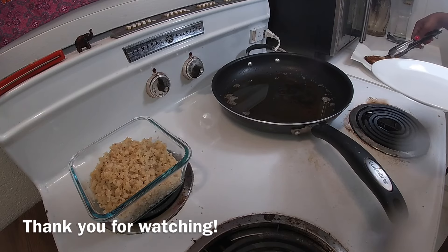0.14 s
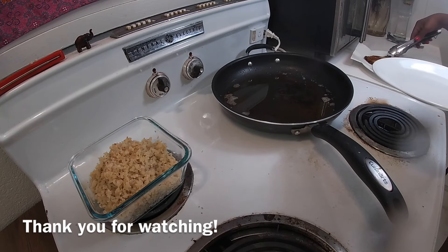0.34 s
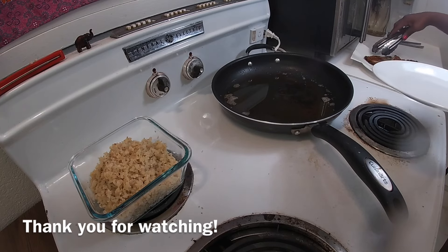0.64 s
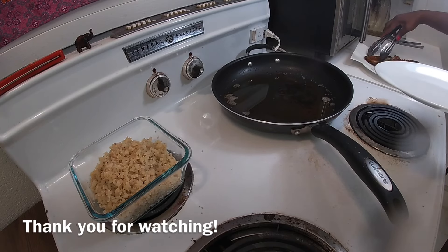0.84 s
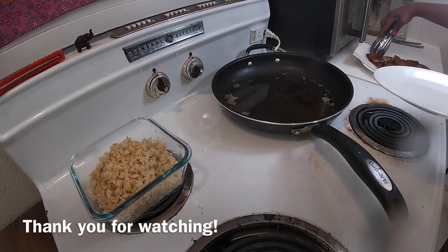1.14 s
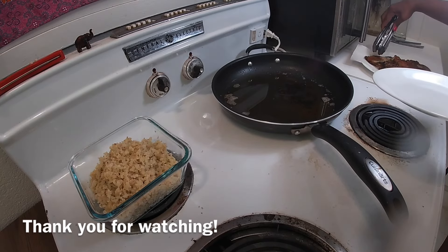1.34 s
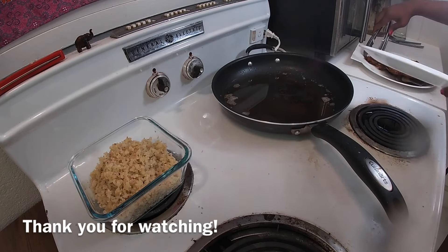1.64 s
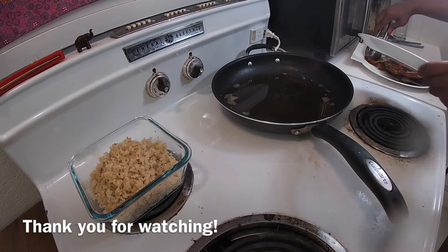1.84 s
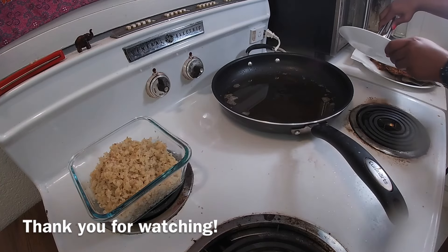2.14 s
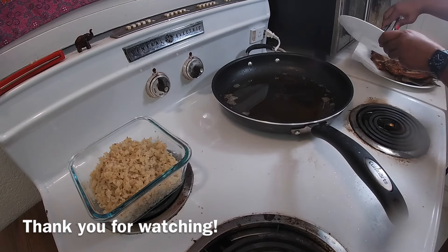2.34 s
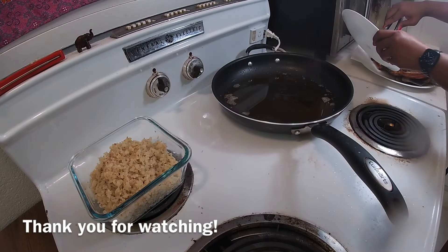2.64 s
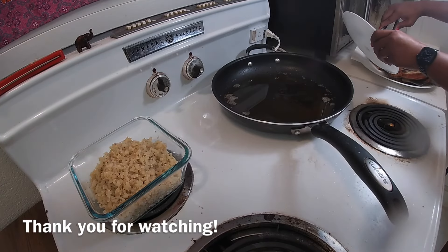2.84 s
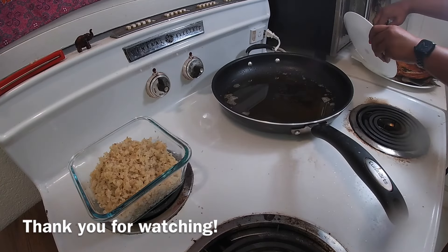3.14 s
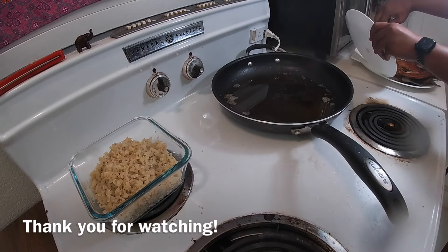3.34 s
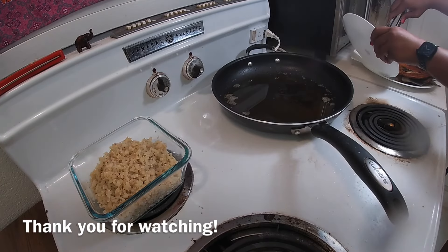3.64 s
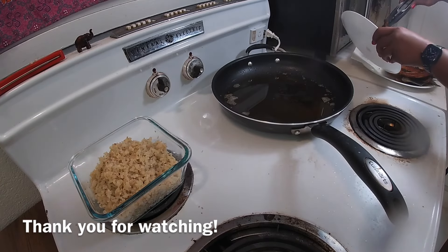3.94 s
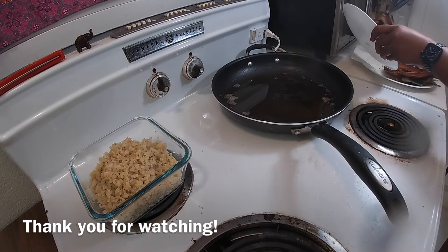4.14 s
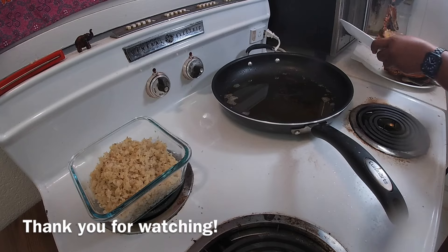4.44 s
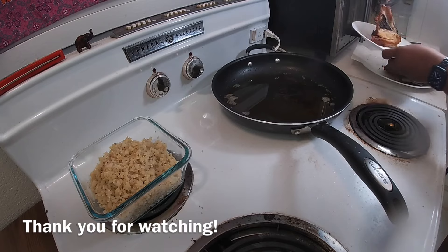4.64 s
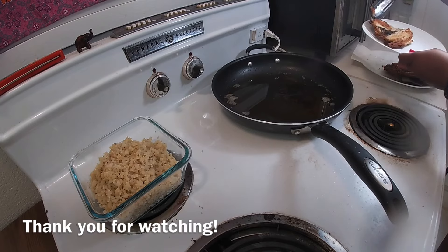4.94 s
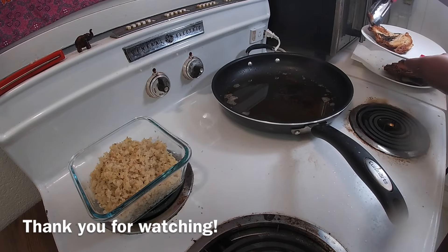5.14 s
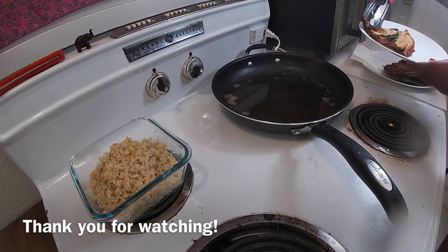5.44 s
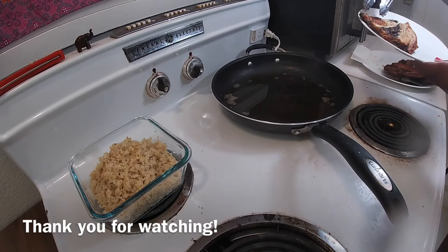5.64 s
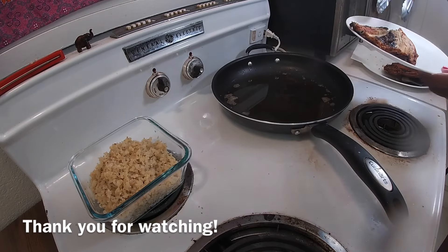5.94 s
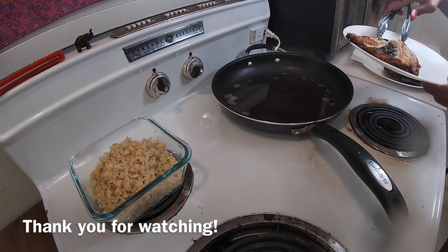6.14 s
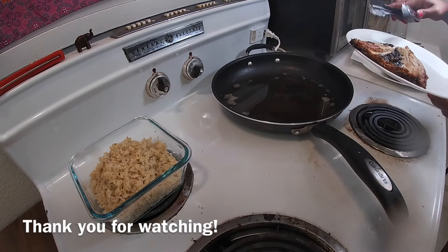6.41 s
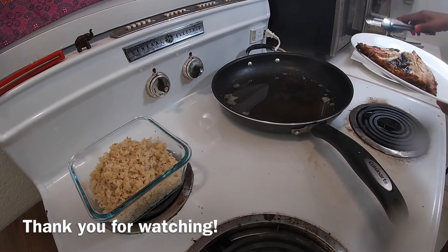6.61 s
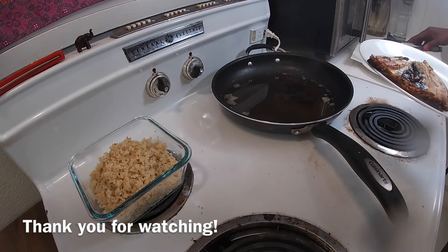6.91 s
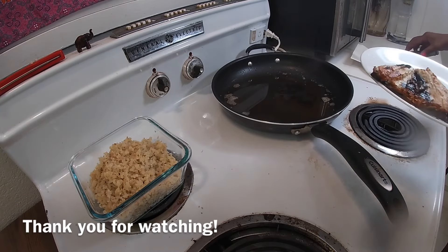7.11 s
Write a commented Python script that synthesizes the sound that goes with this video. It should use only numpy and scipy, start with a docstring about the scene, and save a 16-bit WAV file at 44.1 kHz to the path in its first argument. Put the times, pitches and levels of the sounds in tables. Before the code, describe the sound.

In a small home kitchen, a low wavering motor hum and soft rush of air run throughout. Faint tong ticks and a dull counter bump come first, then a bright cluster of steel-on-ceramic clacks with booming knocks around three seconds. More clinks follow as crisp fried crust rustles. The later part is quiet, with small dry ticks and faint squeaks, before a last soft bump. Close, mono, with short room echo.

```python
"""Steel tongs clack and skid on a hand-held ceramic plate as they lift fried fish from a paper towel.
Filtered noise bursts make the cracks of contact, and banks of decaying sines make steel and plate ring.
Dishes bump the counter with low booms, small dry steel ticks sound, and tiny impulses rustle as crust.
A few faint gliding tones squeak; wavering motor tones and a rush of air hum underneath.
Noise tails give the small kitchen's echo, and the extreme top is cut."""
import sys
import numpy as np
from scipy import signal
from scipy.fft import rfft, irfft, next_fast_len
from scipy.io import wavfile
from scipy.ndimage import uniform_filter1d

SR = 44100
rng = np.random.default_rng(int(sys.argv[2]) if len(sys.argv) > 2 else 0)


def waveform_to_disk(signal):
    """Save audio, clipped to [-1, 1], as 16-bit WAV at the path in sys.argv[1]."""
    frames = np.transpose(np.atleast_2d(signal))
    scaled = np.clip(frames, -1, 1) * 32767
    samples = np.round(scaled).astype(np.int16)
    wavfile.write(sys.argv[1], SR, samples)


N = 320607
T = np.arange(N) / SR  # scene time in seconds
AGE = T[:int(.8 * SR)]  # time since a blow in seconds; every hit and echo is cut at 0.8 s
BURST = SR / 100  # samples in 10 ms, the reference length for the level of a blow

# Spectrum of the crust's crackle, also lent to clicks and grit. Each row: frequency in Hz, level in dB.
CRUST_SPECTRUM = [(300, 10), (1500, 0), (4000, 2.5), (6500, 2), (9500, 0.5), (11200, -11.5), (15000, -23)]
# Steel scoops of the tongs, ringing on after a touch.
# Each row: frequency in Hz, relative level in dB, decay by 60 dB in seconds.
SCOOP_MODES = [(4030, -7.5, 0.36), (4690, -1, 0.065), (4800, -13, 0.41), (5868, -1.5, 0.044),
               (8420, 5, 0.037), (8300, -6, 0.2), (9640, -0.5, 0.09)]


def undb(db):
    """Decibels to gain."""
    return 10 ** (np.asarray(db) / 20)


def unit(x):
    """Scale to rms 1."""
    return x / np.sqrt(np.mean(x ** 2))


def blow(x, db):
    """Give a transient the energy of a 10 ms burst at this level."""
    return x * undb(db) * np.sqrt(BURST / np.sum(x ** 2))


def fade(t60):
    """Exponential decay, falling 60 dB in t60 seconds."""
    return np.exp(-np.log(1000) * AGE / max(t60, 1 / SR))


def lookup(points, hz):
    """Read a table on a log-frequency axis."""
    f, value = np.transpose(points)
    return np.interp(np.log(hz), np.log(f), value)


def colour(x, db_of_hz):
    """Filter causally to the given dB response, with the minimum phase found from its cepstrum."""
    size = 2 * next_fast_len(len(x))
    hz = np.maximum(np.arange(size // 2 + 1) * SR / size, 1)
    cepstrum = irfft(np.log(undb(db_of_hz(hz))))
    # fold the cepstrum onto positive time
    cepstrum[1:size // 2] *= 2
    cepstrum[size // 2 + 1:] = 0
    response = np.exp(rfft(cepstrum))
    return irfft(rfft(x, size) * response)[:len(x)]


def noise(points, size):
    """Noise with a given spectrum, at rms 1."""
    return unit(colour(rng.standard_normal(size), lambda hz: lookup(points, hz)))


def soft(hz, corner_hz):
    """A soft contact lasts longer and loses the treble: dB response, 12 dB per octave past the corner."""
    return -10 * np.log10(1 + (hz / corner_hz) ** 4)


def walk(rate):
    """Smooth random wander of rms 1, taking this many steps per second."""
    k = int(SR / rate)
    steps = np.repeat(rng.standard_normal(N // k + 1), k)
    return unit(uniform_filter1d(steps, k)[:N])


def grains(per_s, spread_db):
    """Random tiny impulses, of uneven size where there is a spread."""
    fires = rng.random(N) < per_s / SR
    sign = rng.choice([-1, 1], N)
    return fires * sign * undb(spread_db * np.minimum(rng.exponential(size=N), 5))


def presses(rows, attack_s, release_s):
    """Hand pressure: each press builds up, holds until its length is over and dies away."""
    out = 0
    for start, length, db in rows:
        rise = np.clip((T - start) / attack_s, 0, 1)
        release = np.exp(-np.maximum(T - start - length, 0) / release_s)
        out = out + undb(db) * rise * release
    return out


def add(out, s, x):
    """Mix a sound in at time s."""
    i = max(int(s * SR), 0)
    out[i:i + len(x)] += x[:N - i]


def ring(modes, detune=0, scatter_db=0.88):
    """Struck modes as decaying sines; each blow shares its energy out a little differently."""
    out = 0
    for hz, db, t60 in modes:
        pitch_hz = hz * (1 + detune * rng.standard_normal())
        wave = np.sin(2 * np.pi * (pitch_hz * AGE + rng.random())) * fade(t60)
        out = out + blow(wave, db + scatter_db * rng.standard_normal())
    return out * (1 - fade(.004))  # the onset is rounded over a few ms


def plate_ring(place):
    """The place of the blow, between face (0) and rim (1), decides which plate modes ring most."""
    # Ceramic plate. Each row: frequency in Hz, relative level in dB when struck on the face,
    # relative level in dB when struck on the rim, decay by 60 dB in seconds.
    plate_modes = [(1164, -1, -21, 0.29), (1165, 5.5, -4.5, 0.23), (5200, -20, -3, 0.11),
                   (2071, -9, -3, 0.26), (2104, -20, -1.5, 0.06), (2350, -8.5, -29, 0.12),
                   (3414, -8.5, -8.5, 0.19), (4010, -5, -23, 0.29), (4860, -7.5, -17, 0.36),
                   (5400, -17, -22, 0.2), (5922, -27, -28, .26), (6638, -11, -40, .26),
                   (9265, -18, -26, 0.3)]
    modes = []
    for hz, face_db, rim_db, t60 in plate_modes:
        modes.append((hz, np.interp(place, [0, 1], [face_db, rim_db]), t60))
    return ring(modes)


def chatter(x, length_s, rebound=0.64, count=4):
    """The steel bounces a few times, more weakly each time; short chatter has weaker bounces."""
    out = x.copy()
    sizes = rebound ** np.arange(1, count + 1) * min(length_s / 0.013, 1)
    for k, size in enumerate(sizes):
        lag = 1 + int(length_s * SR * (k + rng.random()) / 2)
        out[lag:] += size * x[:-lag]
    return out / np.sqrt(1 + np.sum(sizes ** 2))


def clinks(crack_db=-4, crack_t60=0.12, spot_octaves=0.1, wash_t60=0.61, wash_db=-12,
           beat_db=3, beat_rate=160):
    """Tips clack and crack; plate and tongs ring amid noise for crowded weak modes that beat unevenly."""
    # Tongs meet the plate; levels are ahead of the contact filter. Each row: start in seconds,
    # clack level in dB, plate ring level in dB, tong ring level in dB, contact corner in Hz,
    # chatter time scale in seconds, place from 0 face to 1 rim, pitch favoured by the spot in Hz.
    touches = [(2.634, -21, -25.5, -45, 7300, 0.014, .05, 5400),
               (2.9018, -32.5, -40, -53, 6160, 0.0005, .05, 3120),
               (2.993, -41.5, -45.5, -41, 11100, 0.0066, .97, 2060),
               (3.0038, -37.5, -42, -36, 12000, 0.0011, .95, 5900),
               (3.0555, -21.5, -26, -42, 7340, 0.0025, 0.18, 3240),
               (3.58, -22, -28, -47, 8150, 0.00045, .03, 1140),
               (3.958, -42.5, -44.5, -47, 13900, 0.0029, 0.39, 8000),
               (4.0355, -47.5, -47.5, -54, 7000, 0.0094, 0.97, 4800),
               (4.3222, -26.5, -32, -25.5, 2570, 0.0099, 0.56, 1470),
               (4.337, -22, -37, -53, 1270, 0.022, .4, 1100),
               (4.608, -60, -56, -49, 5030, 0.0034, 0.77, 3900),
               (4.771, -55, -46.5, -72, 7750, 0.0054, 0.72, 2150),
               (7.1533, -31, -48, -64, 1560, 0.0062, .3, 1390)]
    # Tong tips, damped by the grip. Each row: frequency in Hz, relative level in dB,
    # decay by 60 dB in seconds.
    tip_modes = [(1056, -10.5, 0.094), (2336, -9, 0.038), (3052, 0.5, 0.017), (4032, 1.5, 0.015),
                 (4710, -4, 0.024), (5420, 0, 0.019), (5990, 3, 0.0066), (8810, -3, 0.018),
                 (9800, -4, 0.011)]
    # Spectrum of the contact crack. Each row: frequency in Hz, level in dB.
    crack_spectrum = [(150, -7.5), (500, -2), (1000, -3.5), (1700, 0), (3000, -6.5), (6000, -3.5),
                      (10000, -4), (11200, -13.5), (15000, -22.5)]
    # the softer the contact, the louder the wash ahead of the contact filter
    hard_hz, wash_lift_db_per_octave = 6940, 2.5
    # the lighter the touch, the more its spot colours it
    full_blow_db, spot_lift_db, spot_db_per_db = -25, 3.5, 0.1174

    out = np.zeros(N)
    for s, clack_db, plate_db, tongs_db, corner_hz, chatter_s, place, spot_hz in touches:
        wash_lift_db = wash_lift_db_per_octave * max(np.log2(hard_hz / corner_hz), 0)
        lift_db = spot_lift_db + spot_db_per_db * (full_blow_db - clack_db)

        crack = noise(crack_spectrum, len(AGE)) * fade(crack_t60)
        clack = blow(ring(tip_modes), 0) + blow(crack, crack_db)

        beating = undb(beat_db * walk(beat_rate)[:len(AGE)])
        wash = noise(crack_spectrum, len(AGE)) * fade(wash_t60) * beating
        ringing = blow(plate_ring(place), plate_db) + blow(ring(SCOOP_MODES, detune=0.0043), tongs_db)
        ringing = ringing + blow(wash, clack_db + wash_db + wash_lift_db)

        build_up = 1 - fade(2 * chatter_s)  # the bounces build the ring up
        hit = blow(chatter(clack, chatter_s), clack_db) + ringing * build_up

        def contact_db(hz):
            """Treble lost to a soft contact, and a narrow lift at the spot's pitch."""
            spot = np.exp(-(np.log2(hz / spot_hz) / spot_octaves) ** 2)
            return soft(hz, corner_hz) + lift_db * spot

        add(out, s, colour(hit, contact_db))
    return out


def skids(slips_per_s=90, pressed_t60=0.38, grit_db=-7, plate_db=-5, place=0.74):
    """Steel sticks and slips on the glaze; each gritty jerk sets tongs and plate jingling."""
    # The tips skid over the glaze. Each row: start in seconds, length in seconds, level in dB.
    slides = [(2.96, .026, -49), (3.9, 0.19, -58.5)]
    pressure = presses(slides, attack_s=0.034, release_s=0.0074)
    jingle = blow(ring(SCOOP_MODES), 0) + blow(plate_ring(place), plate_db)
    jingle = jingle * fade(pressed_t60)  # extra damping under pressure
    grit = noise(CRUST_SPECTRUM, len(AGE)) * fade(0.024)
    jerk = blow(jingle, 0) + blow(grit, grit_db)
    slips = unit(grains(slips_per_s, spread_db=0)) * pressure
    return signal.fftconvolve(slips, jerk / np.linalg.norm(jerk))[:N]


def bumps(rattle_db=-8, low_hz=120, knock_db=-2):
    """The counter booms at a pitch set by its load, with a woody knock on top that has little deep bass."""
    # Dishes bump the counter. Each row: start in seconds, boom level in dB, boom pitch in Hz,
    # boom decay by 60 dB in seconds, contact corner of the knock in Hz.
    thuds = [(.921, -36.5, 150.5, 0.33, 196), (1.384, -23.5, 141.6, 0.27, 100),
             (2.636, -20, 158, 0.29, 1010), (2.904, -31.5, 153.6, 0.54, 786), (3.049, -20, 158, 0.15, 1400),
             (3.058, -14.5, 139.9, 0.283, 516), (3.579, -25, 161, 0.6, 900), (4.324, -31, 213, 2.5, 875),
             (7.1581, -26.5, 225, 0.11, 430), (7.166, -33, 139, 0.32, 296)]
    # Counter and stove top under a knock. Each row: frequency in Hz, relative level in dB,
    # decay by 60 dB in seconds.
    counter_modes = [(191, 2, 0.35), (225, -1, 0.2), (261, -1, 0.1), (324.5, -7, 0.27), (347, -6.5, 0.12),
                     (697, -5, 0.07)]
    rattle_spectrum = [(80, -3.5), (200, 0.0), (450, -7.0), (800, -5.5), (2000, -26.5)]  # (Hz, dB)
    out = np.zeros(N)
    for s, db, boom_hz, t60, corner_hz in thuds:
        boom = np.sin(2 * np.pi * boom_hz * AGE) * fade(t60) * (1 - fade(.06))  # gentle onset
        rattle = noise(rattle_spectrum, len(AGE)) * fade(.25)
        knock = blow(ring(counter_modes), 0) + blow(rattle, rattle_db)
        # the second, swapped call cuts the bass below low_hz
        knock = colour(knock, lambda hz: soft(hz, corner_hz) + soft(low_hz, hz))
        add(out, s, blow(boom, db) + blow(knock, db + knock_db))
    return out


def ticks(rattle_db=0, rattle_t60=0.19, snap_db=-6, snap_t60=0.016):
    """Small dry steel ticks: noise bursts over slightly detuned modes, for snaps, touches and scrapes."""
    # Hinge snaps, light touches on the plate and short scrapes. Each row: start in seconds,
    # level in dB, tilt in dB per octave between 2 and 10 kHz.
    small_hits = [(0.062, -54, -3.5), (0.7436, -58, 2), (0.8, -53, -8.5), (1.281, -53.5, 14),
                  (1.544, -55, 3.5), (1.651, -46.5, 13), (2.145, -52, -3), (2.821, -49, -1.5),
                  (3.8108, -41.5, 2), (4.0868, -45, 8), (4.2114, -53.5, 1.5), (4.689, -55, -2),
                  (4.9284, -48.5, -2), (5.325, -54, 2.5), (5.4026, -53, 0.5), (5.5938, -55, 5),
                  (5.9092, -50.5, -10.5), (6.1124, -48, 5.5), (6.1427, -45.5, 1), (6.333, -46, -2.5),
                  (7.064, -52, 2.5), (7.156, -44, -1.5), (7.247, -49.5, 5)]
    # Steel ring of a tick. Each row: frequency in Hz, relative level in dB, decay by 60 dB in seconds.
    tick_modes = [(3510, -1.5, 0.094), (4260, -2.5, 0.033), (5150, -2.5, 0.096), (6800, -5, 0.083),
                  (7680, -5.5, 0.062), (8980, -2, 0.053), (9500, -4.5, 0.13), (10060, -6, 0.061)]
    out = np.zeros(N)
    for s, db, tilt_db in small_hits:
        rattle = noise(CRUST_SPECTRUM, len(AGE)) * fade(rattle_t60)
        snap = noise(CRUST_SPECTRUM, len(AGE)) * fade(snap_t60)
        steel = ring(tick_modes, detune=0.00455, scatter_db=4.5)
        tick = blow(rattle, rattle_db) + blow(snap, snap_db) + blow(steel, 0)
        tick = colour(tick, lambda hz: tilt_db * np.log2(np.clip(hz, 2000, 10000) / 10000))
        add(out, s, blow(tick, db))
    return out


def rustle(cracks_per_s=2000, spread_db=2.3):
    """Crust and paper give way in many tiny cracks, louder the harder they are pressed."""
    # The tongs squeeze or shift the fish on its paper.
    # Each row: start in seconds, length in seconds, rustle level in dB.
    grabs = [(.84, 0.22, -66.5), (1.3, 0.063, -60), (1.84, 0.025, -58.5), (2.7, 0.094, -62),
             (3.4, 0.15, -62), (3.76, 0.31, -55)]
    # Light rustle all the while the fish is handled, as one row with the same columns:
    # start in seconds, length in seconds, rustle level in dB.
    carrying = (0.63, 6.6, -74)
    cracks = colour(grains(cracks_per_s, spread_db), lambda hz: lookup(CRUST_SPECTRUM, hz))
    return unit(cracks) * presses([*grabs, carrying], attack_s=0.011, release_s=0.021)


def squeaks(jitter_rate=900, flutter_db=3.5, flutter_rate=60, sag_per_s2=3):
    """A thin tone swells and fades on an arch of pitch; when rough it breaks up into a scrape."""
    # Faint squeaks as tongs and plate are handled. Each row: start in seconds, length in seconds,
    # middle pitch in Hz, glide from start to end in Hz, level in dB, pitch roughness as a share.
    chirps = [(0.078, 0.15, 2980, -200, -76, 0.065), (2.176, .14, 2806, 134, -67, 0.011),
              (2.29, 0.043, 3075, -130, -63.5, 0.0091), (5.951, 0.085, 2850, -200, -63.5, 0.098),
              (6.397, 0.27, 2960, -200, -75, 0.01), (6.616, 0.13, 985, -13, -62, .005)]
    out = np.zeros(N)
    for s, length, middle_hz, glide_hz, db, rough in chirps:
        along = np.linspace(-.5, .5, int(length * SR))
        sag = 1 - sag_per_s2 * (along * length) ** 2  # the pitch sags towards both ends
        arch = middle_hz * sag + glide_hz * along
        hz = arch * (1 + rough * walk(jitter_rate)[:len(along)])
        flutter = undb(flutter_db * walk(flutter_rate)[:len(along)])
        swell = np.sqrt(np.abs(np.cos(np.pi * along))) * flutter
        tone = np.sin(2 * np.pi * np.cumsum(hz) / SR)
        add(out, s, undb(db) * unit(swell * tone))
    return out


def appliance(air_db=-53, waver_rate=22, middle_hz=(800, 1800)):
    """Wavering motor tones over a steady rush of air; the middle band swells slowly."""
    # Spectrum of the kitchen's air. Each row: frequency in Hz, level in dB.
    air_spectrum = [(25, -30), (60, 0.5), (110, -17.5), (160, 7), (230, 5.5), (320, -3.5), (450, -10),
                    (900, -14), (1250, -17), (1600, -23.5), (6100, -31.5), (6800, -44), (10000, -41.5),
                    (15000, -87)]
    # Motor tones. Each row: frequency in Hz, rms level in dB ahead of the middle-band swell,
    # unsteadiness from 0 to 1.
    motor_tones = [(157.8, -50.5, 0.54), (229, -60.5, 0.16), (299, -62, 0.96), (1124, -70, 0.12),
                   (1182, -72.5, 0.26)]
    # Slow swell of the middle band. Each row: time in seconds, gain in dB.
    middle_swell = [(0, -4.5), (1, 1), (7.27, 4)]
    out = undb(air_db) * noise(air_spectrum, N)
    for hz, db, unsteady in motor_tones:
        # a complex swing wavers both level and phase
        swing = 1 + unsteady * (walk(waver_rate) + 1j * walk(waver_rate))
        out += undb(db) * unit(np.real(swing * np.exp(2j * np.pi * hz * T)))
    band = signal.butter(2, middle_hz, "band", fs=SR, output="sos")
    middle = signal.sosfiltfilt(band, out)
    gain = undb(np.interp(T, *np.transpose(middle_swell)))
    return out + middle * (gain - 1)


def room(x, tail_db, bright_db, bright_t60=0.58):
    """Echo from 3 ms on: a diffuse tail decaying at its own pace in each band, plus a white-noise tail."""
    # Room decay. Each row: frequency in Hz, decay by 60 dB in seconds.
    room_decay = [(150, 0.32), (400, 0.77), (1000, 0.48), (4000, 0.39), (9000, 0.27), (15000, 0.24)]
    edges = np.geomspace(60, 18000, 10)  # band edges in Hz
    tail = 0
    for lo, hi in zip(edges, edges[1:]):
        band_filter = signal.butter(3, [lo, hi], "band", fs=SR, output="sos")
        band = signal.sosfilt(band_filter, rng.standard_normal(len(AGE)))
        tail = tail + band * fade(lookup(room_decay, np.sqrt(lo * hi)))
    bright = rng.standard_normal(len(AGE)) * fade(bright_t60)
    arrived = AGE > .003
    response = blow(tail * arrived, tail_db) + blow(bright * arrived, bright_db)
    response = response / np.sqrt(BURST)  # levels now count as echo energy against the dry sound
    return x + signal.fftconvolve(x, response)[:N]


def scene():
    """All sources in the kitchen, mixed to one channel; the appliance gets no added echo."""
    steel = room(clinks() + skids(), tail_db=-8.0, bright_db=-19)
    counter = room(bumps(), tail_db=-8.5, bright_db=-15.0)
    small = room(ticks() + rustle() + squeaks(), tail_db=-6.0, bright_db=-8.5)
    return (steel + small + counter + appliance())[None]


def record(dry):
    """The recorder cuts the top steeply above 15.6 kHz."""
    top_cut = signal.ellip(8, .2, 80, 15600, fs=SR, output="sos")  # 0.2 dB ripple, 80 dB stopband
    return signal.sosfilt(top_cut, dry)


dry = scene()
out = record(dry)
waveform_to_disk(out)
```